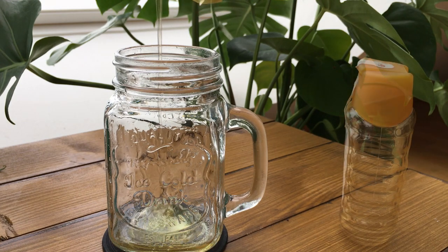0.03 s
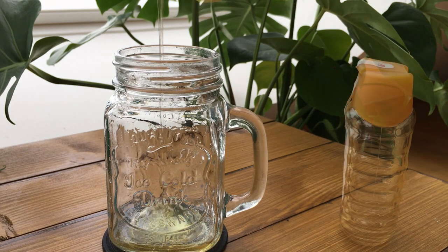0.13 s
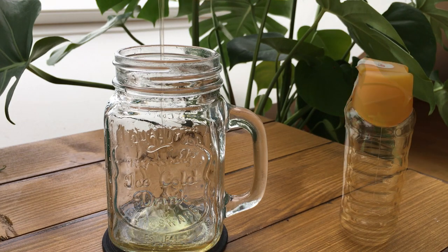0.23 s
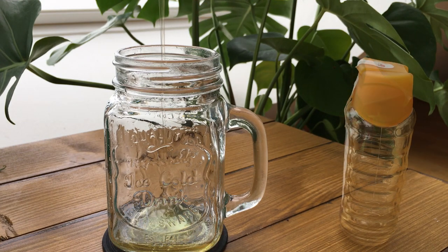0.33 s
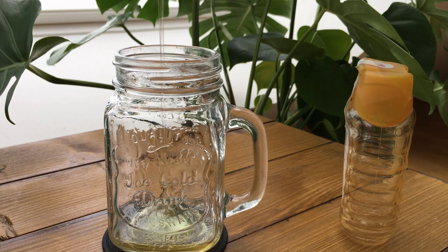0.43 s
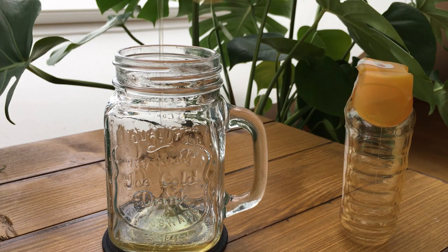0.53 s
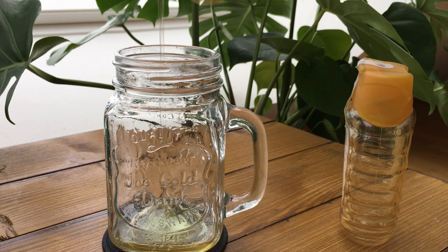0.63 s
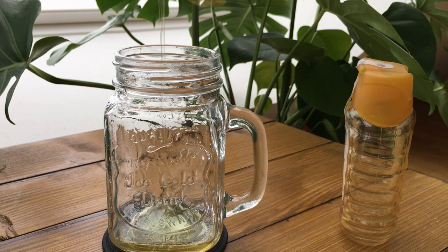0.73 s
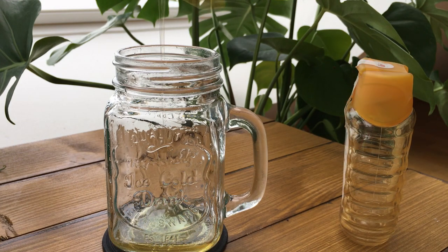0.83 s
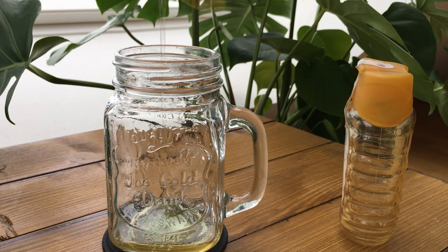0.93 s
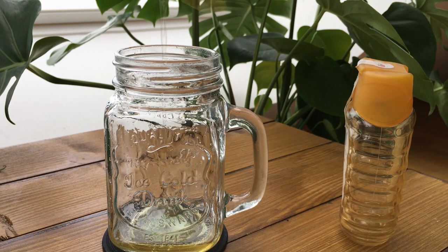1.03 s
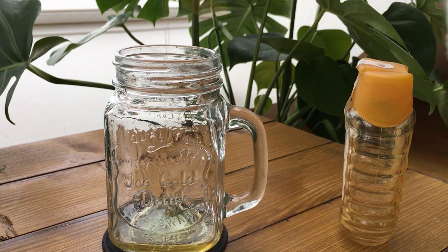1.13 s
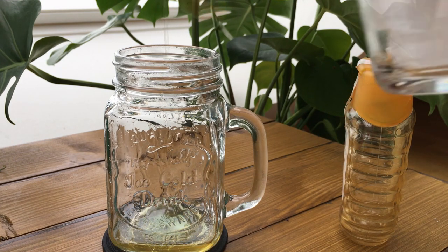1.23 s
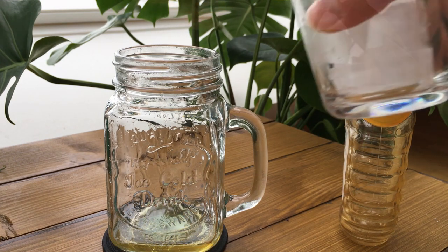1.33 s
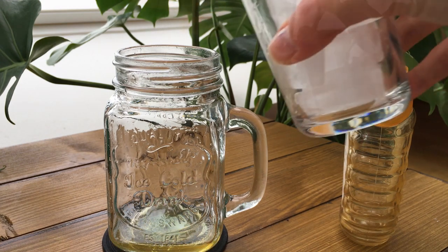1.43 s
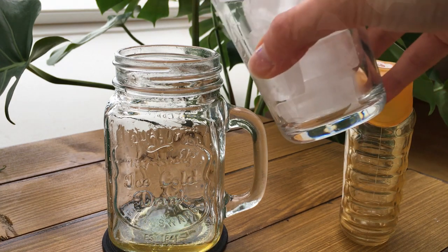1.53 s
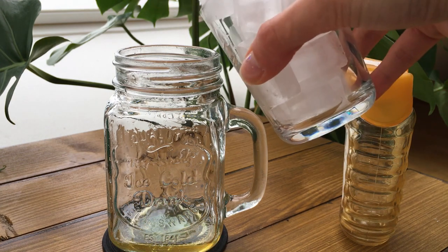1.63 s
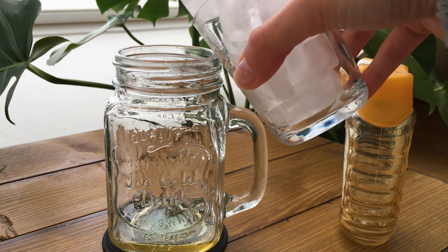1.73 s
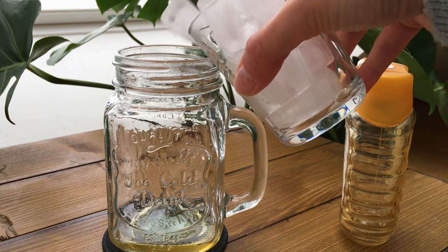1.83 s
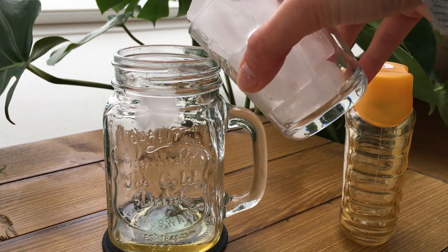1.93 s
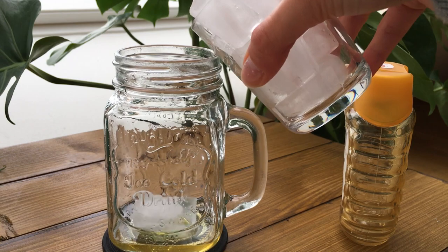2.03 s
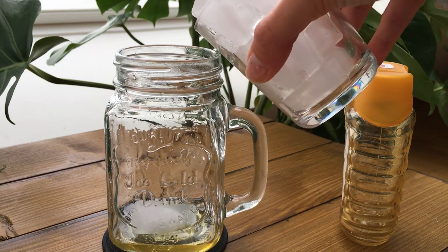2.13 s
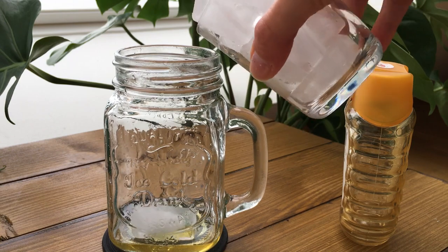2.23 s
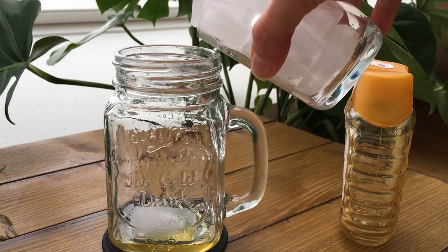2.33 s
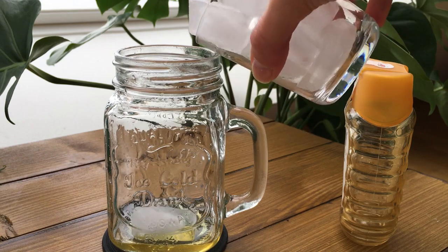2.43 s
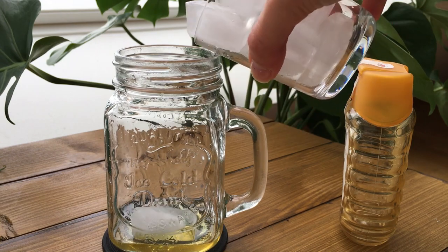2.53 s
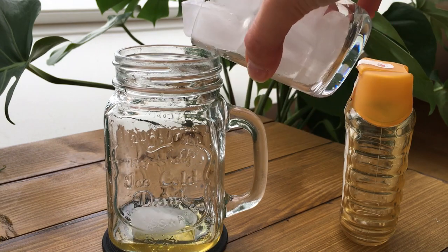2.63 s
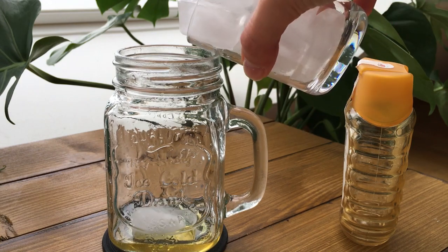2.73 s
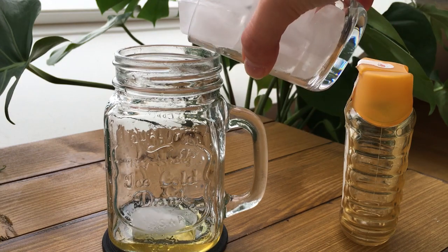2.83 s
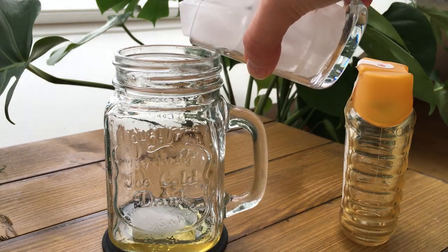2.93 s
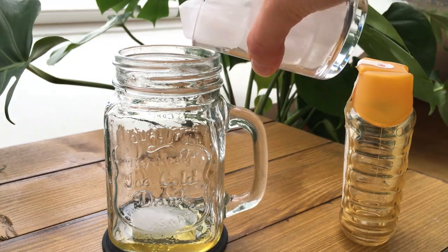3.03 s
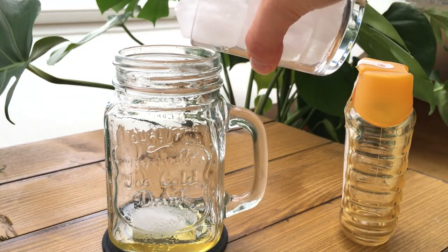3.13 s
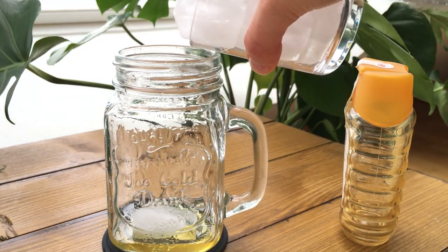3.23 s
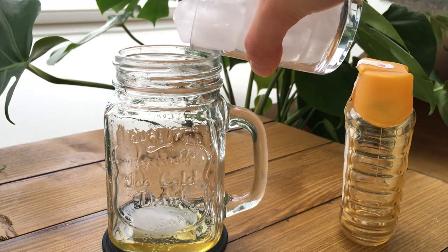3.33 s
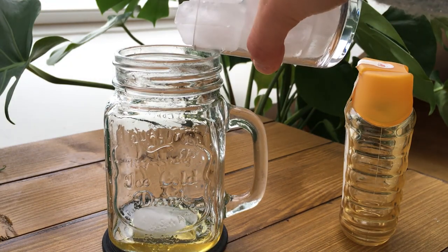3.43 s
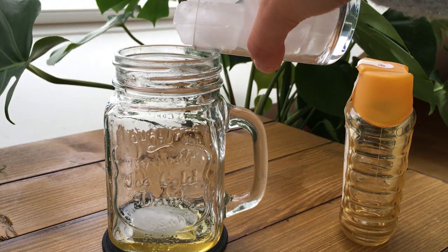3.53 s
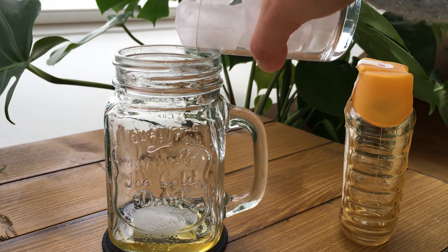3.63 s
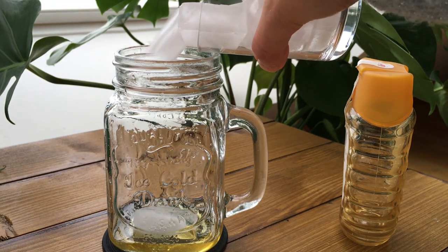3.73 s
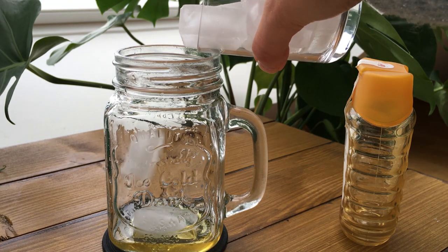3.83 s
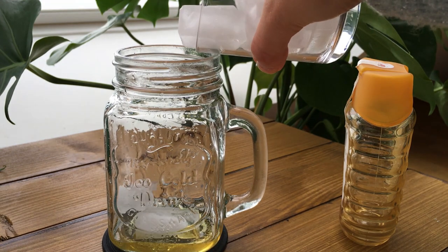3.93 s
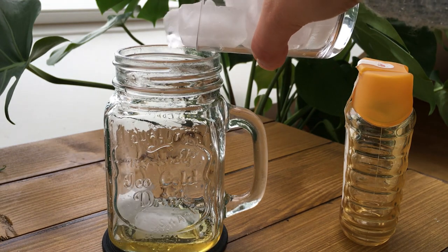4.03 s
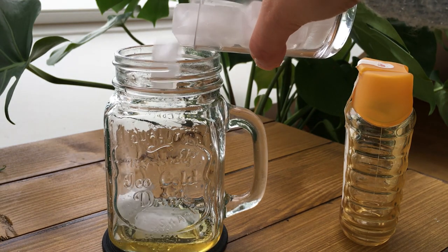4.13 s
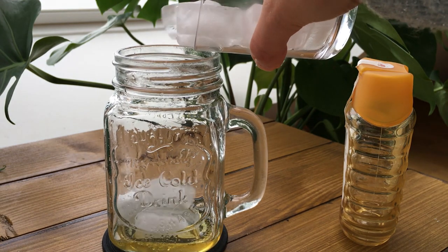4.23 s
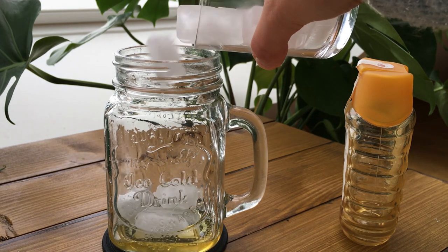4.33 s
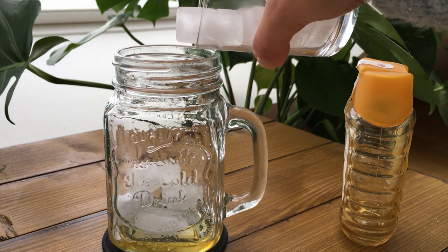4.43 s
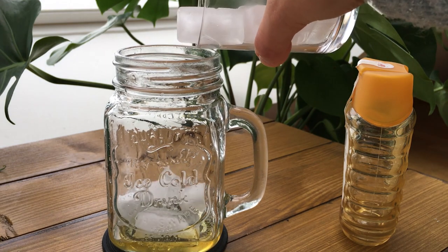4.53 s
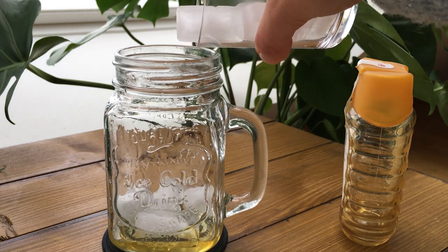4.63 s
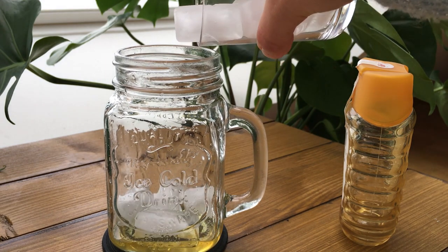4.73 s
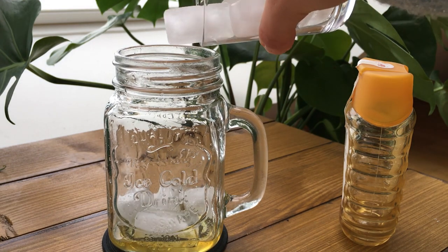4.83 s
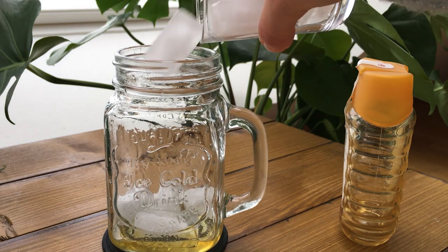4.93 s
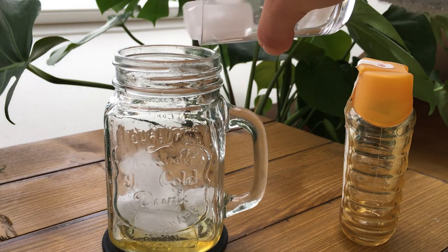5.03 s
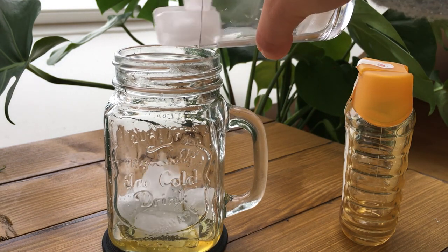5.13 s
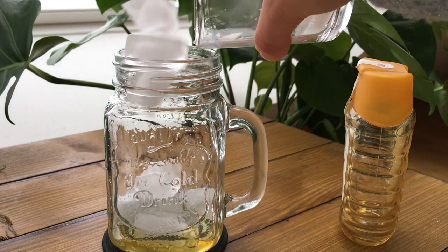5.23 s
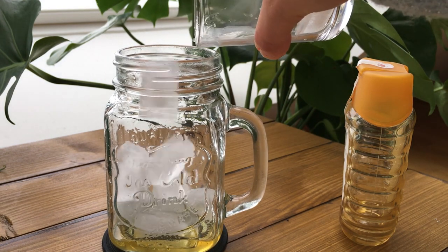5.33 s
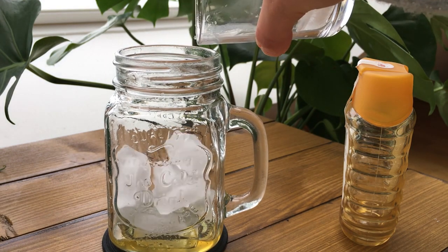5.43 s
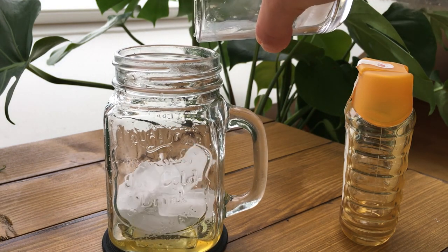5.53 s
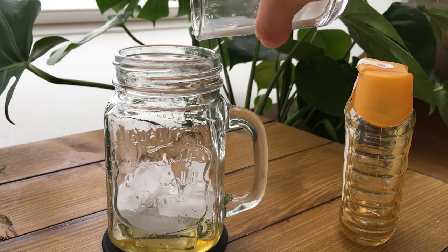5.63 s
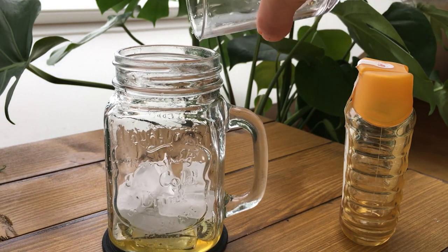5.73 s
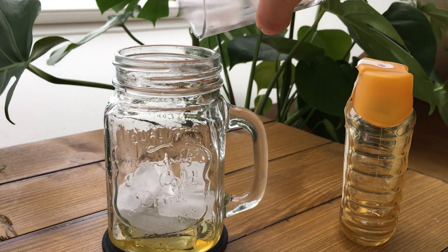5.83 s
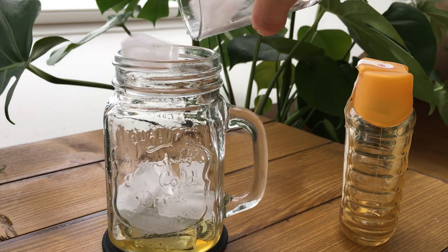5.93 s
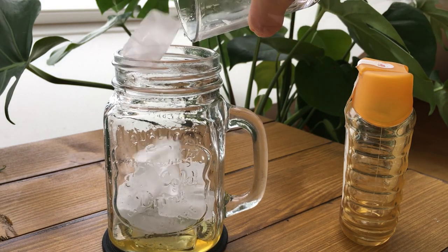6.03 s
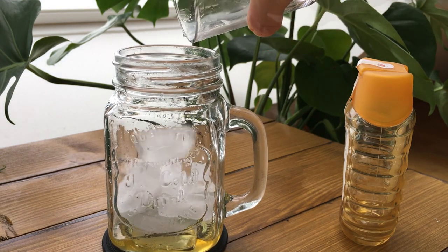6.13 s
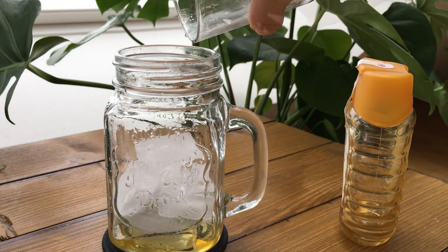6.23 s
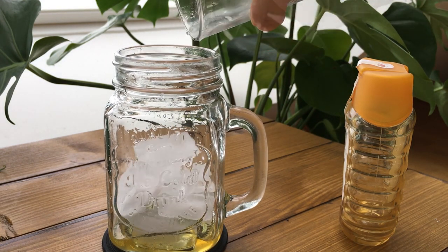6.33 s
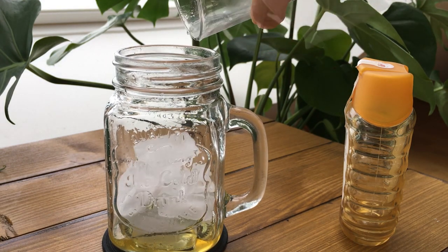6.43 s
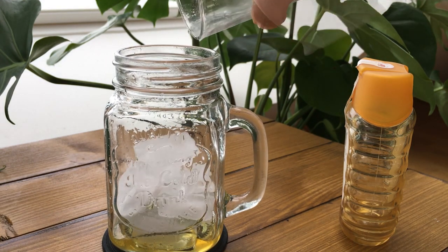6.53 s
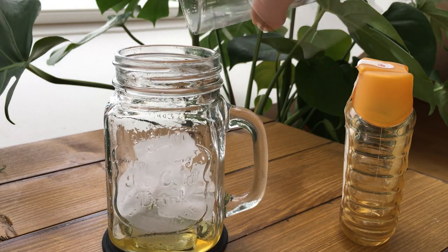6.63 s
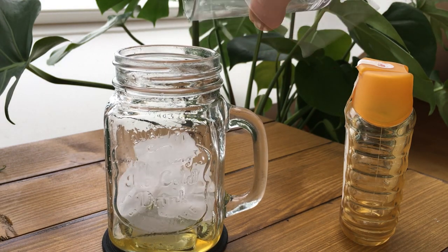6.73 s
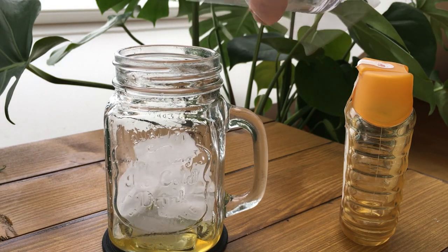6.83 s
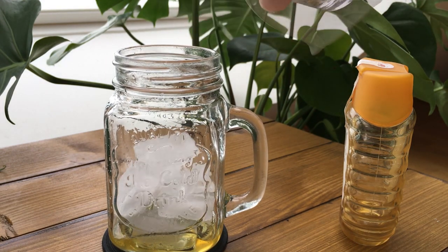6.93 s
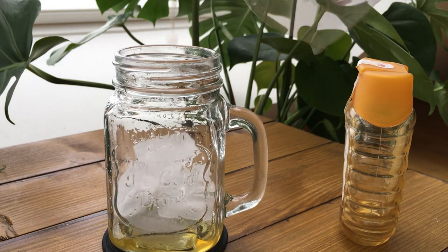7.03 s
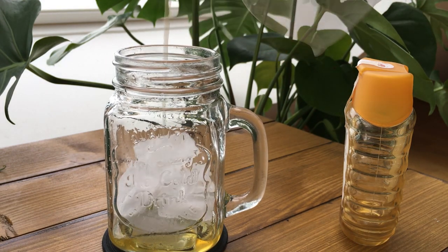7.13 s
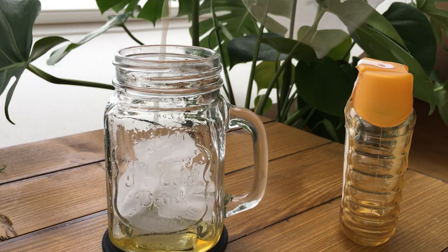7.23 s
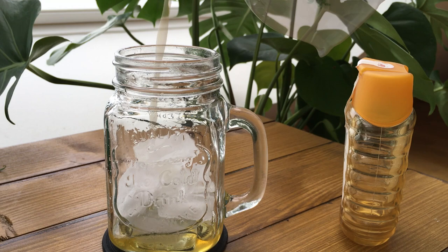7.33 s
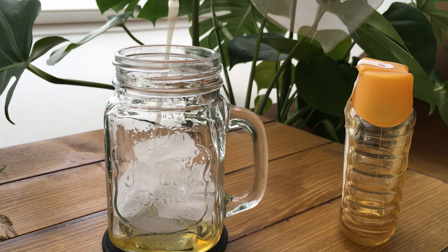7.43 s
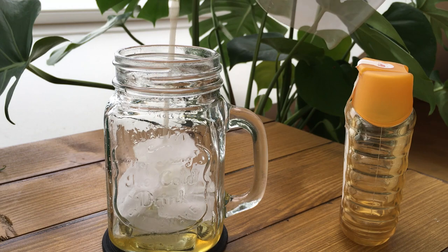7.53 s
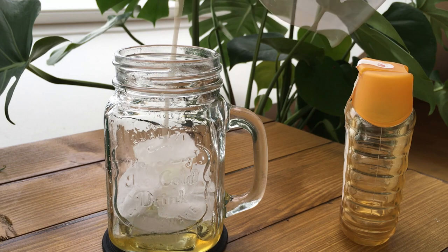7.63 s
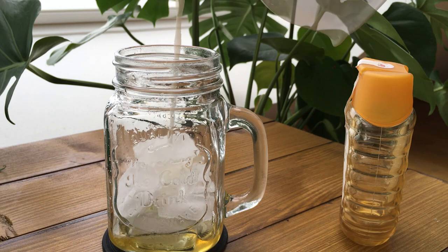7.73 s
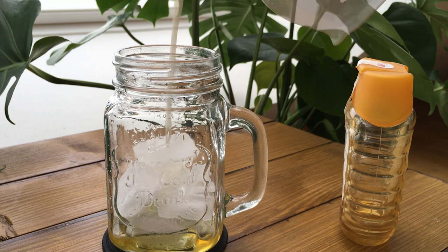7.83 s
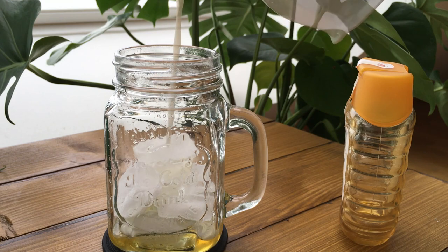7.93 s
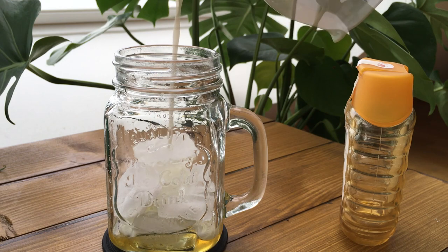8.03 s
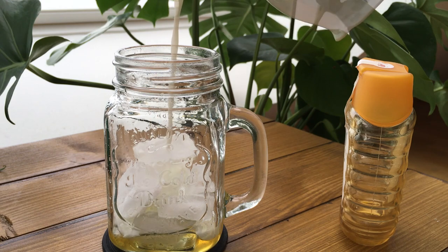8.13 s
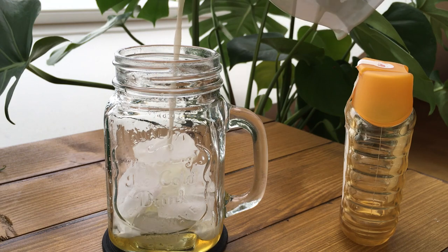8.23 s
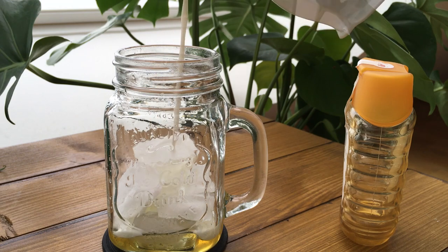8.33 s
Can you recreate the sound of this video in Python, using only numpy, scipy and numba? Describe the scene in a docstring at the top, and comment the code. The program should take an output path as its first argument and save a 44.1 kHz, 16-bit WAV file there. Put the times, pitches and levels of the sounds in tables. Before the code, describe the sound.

A quiet kitchen hums and hisses throughout, with a few faint low bumps and a tiny pip in the first second or so. From 1.4 seconds ice cubes scrape and knock inside a hand-held tumbler. At 1.9 seconds the first ice drops into a glass jar with a brittle crack, a bright ring and a soft thump through the wooden table. Two more clinks follow near 2.7 seconds, and a sharp tumbler knock at 3.3. Clusters of sliding and clattering come from 3.7 to 4.7, most densely from 5.1 to 5.7, and again from 5.8 to 6.3 seconds, each close, with a short room echo. As the jar fills, its hollow note rises and its ring shortens. From 7.2 to 8 seconds the ice gives tiny, high cracking ticks, with two faint background pips around 7.7 seconds.

```python
"""A quiet kitchen hums and hisses, with a few faint bumps and a pip. From 1.4 s ice cubes scrape and knock
in a hand-held tumbler, and from 1.9 s they drop into a glass jar on a wooden table. Each blow cracks and
rings the glass wall and its air column; landings thump the table, and the room answers. As the jar fills,
its air note rises and its ring shortens. From 7.2 s the ice ticks as it cracks under a thin stream,
itself unheard, and two more faint pips sound in the background."""
import sys
import numpy as np
from scipy import signal
from scipy.fft import rfft, irfft, next_fast_len
from scipy.io import wavfile
from numba import njit

SR = 44100
rng = np.random.default_rng(int(sys.argv[2]) if len(sys.argv) > 2 else 0)


def transcribe(u):
    """Save the signal u as a 16-bit wav file named by the first command-line argument.

    u: samples, shape (n,) or (channels, n), limited to [-1, 1]; the rate is SR.
    q: integer samples, one column per channel.
    """
    v = np.clip(np.atleast_2d(u).T, -1, 1)
    q = np.round(v * 32767).astype(np.int16)
    wavfile.write(sys.argv[1], SR, q)


N = 369999

# The tone of ice touching glass. Each row: frequency in Hz, gain in dB.
ICE_CONTACT_EQ = [(300, -38), (1000, -21.5), (2200, 3.5), (4000, 4), (7500, -4), (11000, -3.5), (16000, -7)]
# The tumbler wall, damped by hand and ice, in three families of modes: low, middle, top.
# Each row: pitch in Hz, level in dB, t60 in seconds before the ring factor.
TUMBLER_WALL = [
    [(2193, 0, 0.033), (2470, -3.5, 0.029)],
    [(3350, -4, 0.012), (5260, -3, 0.02), (5690, -8.5, 0.017)],
    [(13400, 1, .025), (14150, -6.5, .025)],
]
# The tumbler rings longer as it tips and empties. Each row: time in seconds, ring factor, high mode in Hz,
# air column in dB against the crack, then high mode and top family in dB against the upper modes.
TUMBLER_TIPPING = [(1.5, 0.75, 8740, -26, 9.5, -10), (1.62, 0.57, 9400, -9, 0.5, -9.5),
                   (1.901, 0.67, 9900, -15, 0, -19.5), (2.901, 0.73, 8860, -40, 3.5, -13.5),
                   (4.3, 0.88, 8980, -32.5, 2.5, -1.5), (4.999, 1, 8830, -28.5, 1, -2.5),
                   (5.7, 1.23, 10030, -23, -8.5, -27.5)]
TUMBLER_AIR_HZ = 930  # the air column before the first cube leaves


def undb(db):
    """Decibels to gain."""
    return 10 ** (np.asarray(db, float) / 20)


def colour(x, points):
    """EQ through (Hz, dB) points on a log-frequency axis."""
    hz, db = np.transpose(points)
    size = next_fast_len(len(x))
    bin_hz = np.maximum(np.arange(size // 2 + 1) * SR / size, 1)
    gain = undb(np.interp(np.log(bin_hz), np.log(hz), db))
    return irfft(rfft(x, size) * gain, size)[:len(x)]


def band(x, lo_hz, hi_hz):
    """Gentle Butterworth band-pass."""
    return signal.sosfilt(signal.butter(2, [lo_hz, min(hi_hz, .45 * SR)], "band", fs=SR, output="sos"), x)


def swells(start_s, length_s, db, rise_s, fall_s):
    """Envelope of events that grow, hold and fade, 10 dB in each rise or fall time."""
    t = np.arange(0, N, 64) / SR
    early = np.maximum(start_s[:, None] - t, 0) / rise_s
    late = np.maximum(t - (start_s + length_s)[:, None], 0) / fall_s
    gain = undb(db[:, None] - 10 * (early + late)).sum(axis=0)
    return np.interp(np.arange(N) / SR, t, gain)


@njit
def strike(at, size, pole, keep, like):
    """A resonator: every blow damps the old ring to the share `keep` and adds its own."""
    out, ring = np.zeros_like(like), 0j
    for k in range(len(size)):
        ring = keep * ring + size[k]
        for i in range(at[k], at[k + 1]):
            out[i] = ring.imag
            ring *= pole[k]
            if abs(ring.real) + abs(ring.imag) < 1e-7:
                break
    return out


def mode(start_s, db, hz, t60, keep, scatter_db=2.0):
    """A mode struck at each start; the spot struck sets its sign and scatters its level."""
    spot = rng.standard_normal((len(start_s), 2))
    size = np.sign(spot[:, 0]) * undb(db + scatter_db * spot[:, 1])
    decay = np.log(1000) / (np.maximum(t60, .003) * SR)
    pole = np.exp(2j * np.pi * hz / SR - decay) * np.ones(len(start_s))
    at = np.maximum.accumulate((start_s * SR).astype(np.int64))
    return strike(np.append(at, N), size, pole, keep, np.empty(N))


def bursts(start_s, db, decay_s):
    """Short noise bursts that die away."""
    kicks = np.zeros(N)
    np.add.at(kicks, (start_s * SR).astype(int), undb(db))
    envelope = signal.lfilter([1], [1, -np.exp(-1 / (decay_s * SR))], kicks)
    return envelope * rng.standard_normal(N)


def kitchen():
    """A bed of steady rumble and hiss, with faint low bumps elsewhere in the room."""
    # The shape of the room tone. Each row: frequency in Hz, relative level in dB.
    room_tone_eq = [(22, -38.5), (31, -14), (42, 3), (62, -2), (85, -11.5), (160, -13), (250, -17.5),
                    (500, -27.5), (1000, -32.5), (4000, -37.5), (7000, -39), (11000, -35.5), (16000, -34)]
    # Each row: time of the bump's peak in seconds, level in dB.
    bumps = [(.0, -65), (.38, -66.5), (.69, -68), (1.29, -68)]
    bed = colour(rng.standard_normal(N), room_tone_eq)
    low = band(rng.standard_normal(N), 120, 460)
    peak_s, db = np.transpose(bumps)
    bump_gain = swells(peak_s, 0, db, rise_s=.033, fall_s=.08)
    return bed / bed.std() * undb(-65) + low / low.std() * bump_gain


def pips():
    """Faint short notes in the background."""
    # Each row: start in seconds, level in dB, pitch in Hz.
    notes = [(0.5906, -68, 1660), (7.6094, -76.5, 1900), (7.7792, -72, 1895)]
    start_s, db, hz = np.transpose(notes)
    return mode(start_s, db, hz, t60=.037, keep=0., scatter_db=0)


def slide(slips_per_s=700, spread_db=6.0):
    """Ice scrapes the tumbler: dense uneven micro-slips, heard directly and through its wall and air."""
    # Each row: start of the scrape in seconds, hold in seconds, level in dB.
    scrapes = [(1.387, 0.031, -77), (1.649, 0.1, -59), (1.851, 0.11, -47), (3.217, 0.065, -72.5),
               (3.645, 0.021, -64), (3.733, 0.11, -62.5), (3.988, 0.13, -54), (4.23, 0.13, -50.5),
               (4.44, 0.067, -72.5), (4.913, 0.09, -65), (5.227, 0.1, -58.5), (5.397, 0.27, -57),
               (5.852, 0.2, -56), (6.16, .13, -58.5)]
    chance, strength = rng.random((N, 2)).T
    slip_db = -spread_db * np.log(1 - .98 * strength)
    slips = (chance < slips_per_s / SR) * undb(slip_db) * rng.standard_normal(N)
    t = np.arange(N) / SR
    when, _, high_hz, air_db, *_ = np.transpose(TUMBLER_TIPPING)
    low, middle = (sum(undb(db) * band(slips, hz * .92, hz * 1.08) / hz for hz, db, _ in family)
                   for family in TUMBLER_WALL[:2])
    # the high mode moves with the load: a narrow band of slips rides on its pitch
    carrier = np.cos(2 * np.pi * np.cumsum(np.interp(t, when, high_hz)) / SR)
    high = band(slips, 15, 300) * carrier
    top = band(slips, 11000, 14300)
    air = band(slips, TUMBLER_AIR_HZ * .96, TUMBLER_AIR_HZ * 1.08)
    direct = colour(slips, ICE_CONTACT_EQ)
    mix = [(low, 0), (middle, -6), (high, -9), (top, -12), (direct, -7),
           (air, np.interp(t, when, air_db) + 7.5)]
    scrape = sum(undb(db) * layer / layer.std() for layer, db in mix)
    return scrape * swells(*np.transpose(scrapes), rise_s=.05, fall_s=.06)


def room(x):
    """The kitchen's diffuse tail builds over 6 ms; each octave fades at its own rate."""
    # Each row: centre of the octave in Hz, t60 in seconds, level in dB.
    octaves = [(350, 0.79, -12), (686, 0.46, -8), (1400, 0.4, -12.5), (2830, 0.47, -16.5),
               (5693, 0.5, -16.5), (11000, 0.25, -18)]
    t = np.arange(SR // 2) / SR
    fade_in = np.clip(t / .006, 0, 1)
    tail = 0
    for hz, t60, db in octaves:
        noise = band(rng.standard_normal(len(t)), hz / np.sqrt(2), hz * np.sqrt(2))
        envelope = fade_in * 1000 ** (-t / t60)
        tail = tail + undb(db) * noise * envelope / np.sqrt(t60 * SR / 14)
    return signal.fftconvolve(x, tail)[:N]


def crack(start_s, db, snap_s, tail_s, tail_db):
    """Brittle contact of ice on glass: a snap, a crumbling tail and the cube's own two-note clack."""
    octaves = np.clip(.6 * rng.standard_normal((len(start_s), 2)).T, -1, 2)
    clack = sum(mode(start_s, db - 8, hz, t60=.0061, keep=0.) for hz in 3300 * 2 ** octaves)
    snap = bursts(start_s, db, snap_s)
    crumble = bursts(start_s, db + tail_db, tail_s)
    return colour(snap + crumble, ICE_CONTACT_EQ) + clack


def tumbler():
    """Cubes knock on short, hand-damped modes; the high one sits where grip and load leave it."""
    # Each row: start of the blow in seconds, then levels in dB of crack, low modes and upper modes.
    blows = [(1.404, -47.5, -61, -52.5), (1.417, -47.5, -78, -61), (1.6122, -42, -49, -50.5),
             (1.6744, -34, -30.5, -43.5), (1.6812, -31.5, -27, -34), (1.772, -27, -40.5, -38.5),
             (1.796, -40.5, -54, -48.5), (1.856, -7.5, -17.5, -25.5), (3.036, -62, -74.5, -64.5),
             (3.2445, -57, -45, -53), (3.2665, -19, -36.5, -17), (3.6361, -40.5, -46, -61),
             (3.7279, -45, -39, -40), (3.7543, -38, -32.5, -28), (3.764, -30, -32.5, -36),
             (3.7754, -32, -42, -43), (3.7932, -36, -31.5, -42), (4.0388, -45, -34, -38),
             (4.0544, -31.5, -35.5, -39), (4.1887, -38.5, -40, -46), (4.2098, -32.5, -52.5, -41.5),
             (4.218, -49, -38, -39.5), (4.2504, -27.5, -41, -40), (4.2557, -22, -31.5, -25.5),
             (4.3027, -33.5, -48.5, -29), (4.3116, -36, -26, -30), (4.3589, -24, -25.5, -27.5),
             (4.9227, -59, -43, -60.5), (5.793, -31.5, -41.5, -29.5), (5.8547, -42, -40.5, -41.5),
             (5.9007, -36.5, -31, -32.5), (5.915, -45, -40.5, -28), (5.9356, -27.5, -36.5, -35.5),
             (5.956, -40, -35.5, -33.5), (5.9715, -42.5, -33.5, -39.5), (5.9853, -42.5, -33.5, -37.5),
             (6.0697, -52.5, -36.5, -52.5)]
    start_s, crack_db, low_db, upper_db = np.transpose(blows)
    when, *tipping = np.transpose(TUMBLER_TIPPING)
    ring, high_hz, air_db, high_db, top_db = (np.interp(start_s, when, column) for column in tipping)
    # the air note rises while the first cube slides out
    sliding_s = np.clip(start_s - when[1], 0, when[2] - when[1])
    air_hz = TUMBLER_AIR_HZ * (1 + .51 * sliding_s)
    air = mode(start_s, crack_db + air_db, air_hz, t60=.052, keep=.7, scatter_db=.5)
    family_db = [low_db, upper_db, upper_db + top_db]
    wall = sum(mode(start_s, blow_db + db, hz, t60 * ring, keep=.72)
               for blow_db, family in zip(family_db, TUMBLER_WALL) for hz, db, t60 in family)
    high = mode(start_s, upper_db + high_db, high_hz, t60=.029 * ring, keep=.6, scatter_db=-1.4)
    knock = band(bursts(start_s, low_db - 1, decay_s=.003), 730, 2300)
    contact = crack(start_s, crack_db, snap_s=.0015, tail_s=.0085, tail_db=-14.5)
    return wall + high + air + knock + contact


def jar():
    """Falling cubes crack on the jar and ring its wall and air column, each with a dull knock."""
    # A corner excites the treble more than a flat face. Each row: start of the blow in seconds,
    # then levels in dB of crack, lowest wall mode, middle modes, treble modes, air column and knock.
    blows = [(1.9269, -16, -23.5, -41.5, -41, -31.5, -25.5), (1.9649, -29, -39.5, -31.5, -29.5, -28.5, -41),
             (1.9801, -6, -40, -33.5, -37, -50, -18), (2.0113, -19, -19, -23, -19, -29, -27.5),
             (2.7089, -16.5, -21.5, -37, -31.5, -29.5, -23), (2.7887, -15, -25.5, -47.5, -37, -28.5, -28.5),
             (2.8691, -32, -52, -62.5, -65, -62, -42), (3.4966, -44.5, -49.5, -63, -51.5, -41, -40.5),
             (3.7099, -22, -48, -46.5, -41, -37, -33.5), (3.811, -14.5, -17, -21, -23, -32.5, -40.5),
             (3.8663, -29, -29, -33, -39, -67, -43), (3.9326, -28.5, -43, -44, -55, -36, -38),
             (3.9477, -14, -32.5, -34.5, -24, -23.5, -18.5), (3.9628, -15.5, -18.5, -7, -30, -35, -36.5),
             (3.9853, -23, -16, -16, -15.5, -38, -43), (4.3251, -38, -34.5, -38, -45, -46, -33),
             (4.3339, -12, -29.5, -33.5, -32.5, -31.5, -45), (4.4564, -23.5, -45.5, -36, -34.5, -39, -52),
             (4.5117, -18.5, -29.5, -31, -34, -23.5, -20.5), (4.521, -16.5, -30, -42, -43.5, -28.5, -41),
             (4.5781, -13.5, -13, -22, -25, -32, -29.5), (4.6111, -15, -21, -22, -42, -56.5, -41.5),
             (4.6492, -26, -24, -28, -30, -56, -59), (5.137, -22, -38, -33.5, -31.5, -19.5, -16),
             (5.1548, -14.5, -20.5, -13, -24, -45.5, -44.5), (5.1607, -23, -7, -9, -17.5, -57.5, -51),
             (5.2855, -24, -33.5, -32, -40.5, -44, -21), (5.2948, -14.5, -21, -24.5, -28, -34.5, -27),
             (5.3541, -25.5, -44.5, -40, -41, -46.5, -42.5), (5.3637, -23, -17, -19, -31.5, -55, -47.5),
             (5.3896, -19.5, -12.5, -30, -14, -34, -34.5), (5.3985, -21.5, -3.5, -11, -20, -31, -41.5),
             (5.4314, -24.5, -28, -17, -33.5, -37, -35.5), (5.4421, -30.5, -21, -15.5, -22, -55, -43.5),
             (5.4843, -16, -14.5, -21, -30.5, -37.5, -38), (5.5041, -27, -23, -22, -30, -35.5, -32),
             (5.5212, -12, -16, -13.5, -16, -50, -37.5), (5.5703, -29, -30, -29, -34.5, -39, -26),
             (5.5954, -19.5, -20, -22, -33, -41.5, -30), (5.6904, -33.5, -29.5, -42, -49, -44, -32),
             (6.0056, -15.5, -15.5, -18.5, -23.5, -21.5, -34),
             (6.1243, -41.5, -22.5, -34.5, -14, -21.5, -27), (6.1296, -2.5, -8.5, -13, -23, -50.5, -25),
             (6.1509, -28.5, -28, -41, -35, -67, -45.5), (6.1665, -20, -32, -26, -23, -43.5, -43),
             (6.1923, -25, -24.5, -25, -28, -37.5, -32.5), (6.2349, -18, -24.5, -24, -29.5, -27, -20.5),
             (6.2507, -21, -45, -28.5, -39, -34, -27), (6.2711, -27.5, -27.5, -42, -45, -43, -34),
             (6.3166, -43, -40, -53, -54, -45, -35.5)]
    # The glass in five families of modes: lowest, base, middle, high, top.
    # Each row: pitch in Hz, level in dB, t60 of the free ring in seconds.
    wall_modes = [
        [(3574, 0, .18)],
        [(4043, 0, .27), (4520, -10, .07)],
        [(4933, -5, .13), (5152, -7, .075), (5812, -10, .12), (5900, -12, .09), (7200, -22, .07)],
        [(8375, -14, .1), (8858, -6, .12), (9062, -9, .08), (9428, -7, .08), (9625, -13, .06), (9890, -12, .12)],
        [(10890, -6, .05), (12160, -13, .07), (12780, -14, .05), (13090, -13, .05), (13515, -9, .06),
         (14290, -13, .06), (15030, -15, .045)],
    ]
    # Piling ice lifts the air note, lowers the knock and damps the wall. Each row: time in seconds,
    # air note in Hz, knock in Hz, share of the free ring time, base family in dB against the treble.
    filling = [(1.9, 486, 2165, 1, -8.5), (2.1, 500, 2150, 0.96, -6), (2.75, 523.4, 2057, 1, -15),
               (3.9, 518.3, 1925, 0.94, -23), (4.498, 548.6, 1980, 0.94, -11),
               (5.141, 554, 2040, 0.86, -20.5), (5.29, 536, 2123, 0.84, -15.5), (5.57, 586, 1937, .8, -11),
               (6.001, 585, 1950, 0.38, -10), (6.3, 615, 1805, 0.39, 3)]
    start_s, crack_db, lowest_db, middle_db, treble_db, air_db, knock_db = np.transpose(blows)
    when, *fill = np.transpose(filling)
    air_hz, knock_hz, ring, base_db = (np.interp(start_s, when, column) for column in fill)
    family_db = [lowest_db, treble_db + base_db, middle_db, treble_db, treble_db - 1]
    family_scatter_db = [.5, 1.5, 2.5, 4.5, 5.5]  # fine mode shapes depend more on the spot struck
    base_hz = wall_modes[1][0][0]
    wall = 0
    for blow_db, scatter_db, family in zip(family_db, family_scatter_db, wall_modes):
        for hz, db, t60 in family:
            # ice resting on the wall shifts the upper modes a little at each blow
            detune = 1 + .0024 * (hz > base_hz) * rng.standard_normal(len(start_s))
            wall += mode(start_s, blow_db + db, hz * detune, t60 * ring, keep=.3, scatter_db=scatter_db)
    wall = band(wall, 2500, 19000)  # the wall's ring is kept above 2.5 kHz, with no low thud
    air = mode(start_s, air_db, air_hz, t60=.11 * ring ** .4, keep=.9, scatter_db=-3.5)
    air = band(air, 547, 1500)  # the column needs a cycle or two to swing up
    knock_tone = mode(start_s, knock_db - 5.5, knock_hz, t60=.069, keep=.44, scatter_db=0)
    knock_noise = band(bursts(start_s, knock_db + 7.5, decay_s=.00068), 830, 4300)
    contact = crack(start_s, crack_db - 5, snap_s=.0017, tail_s=.012, tail_db=-11.5)
    return wall + air + knock_tone + knock_noise + contact


def table():
    """Landing cubes thump the wooden table; its low boards take a moment to swing."""
    # Each row: start of the thump in seconds, level in dB.
    landings = [(1.93, -49), (2.01, -55), (2.094, -43), (2.709, -45.5), (2.79, -44.5), (3.707, -57),
                (3.819, -48), (3.952, -43), (4.317, -43), (4.521, -41), (5.14, -39.5), (5.221, -47),
                (5.288, -54.5), (5.393, -46), (5.439, -46), (5.511, -46.5), (5.57, -52), (5.719, -51),
                (6.008, -52.5), (6.141, -49), (6.241, -43), (6.33, -50.5)]
    # Each row: pitch of a board mode in Hz, level in dB, t60 in seconds.
    board_modes = [(77.5, 3, 0.26), (81.5, 0, 0.15), (165.3, -3.5, 0.11)]
    start_s, db = np.transpose(landings)
    boards = sum(mode(start_s, db + mode_db, hz, t60, keep=.7, scatter_db=-1)
                 for hz, mode_db, t60 in board_modes)
    return band(band(boards, 60, 220), 60, 220)


def ticks():
    """Ice cracking under water: tiny bright snaps with a brief pitch."""
    # Each row: start in seconds, level in dB, pitch in Hz.
    fractures = [(7.197, -55, 9420), (7.4004, -62, 8390), (7.4454, -63.5, 11080), (7.5809, -50, 13800),
                 (7.5914, -60.5, 9510), (7.601, -45, 13540), (7.6907, -57.5, 8970), (7.8104, -64, 9000),
                 (7.8394, -65.5, 9290), (8.003, -45, 12780), (8.0126, -51, 13960)]
    start_s, db, hz = np.transpose(fractures)
    ping = mode(start_s, db - 3, hz, t60=.012, keep=0., scatter_db=0)
    snap = band(bursts(start_s, db - 3, decay_s=.00076), 8900, 17000)
    body = band(bursts(start_s, db - 22, decay_s=.0023), 2000, 4100)
    return ping + snap + body


def scene():
    """Glass and ice with their room tail, over dry table thumps and the background, in mono."""
    near = jar() + tumbler() + slide() + ticks()
    return (near + room(near) + table() + pips() + kitchen())[None]


def record(dry):
    """Soft saturation rounds the loudest peaks; a steep low-pass cuts the top at 16 kHz."""
    rounded = np.tanh(1.068 * dry) / 1.142
    return signal.sosfilt(signal.ellip(10, .2, 60, 16000, fs=SR, output="sos"), rounded)


dry = scene()
out = record(dry)
transcribe(out)
```